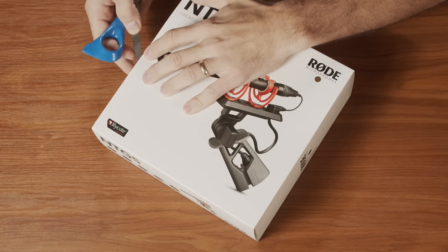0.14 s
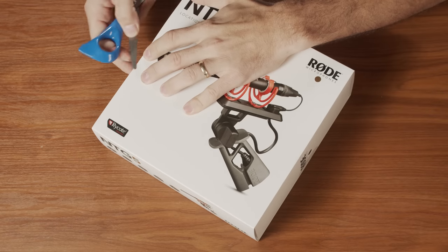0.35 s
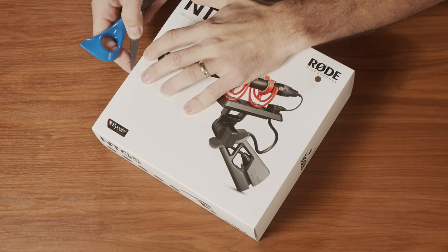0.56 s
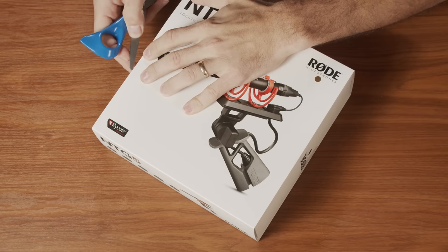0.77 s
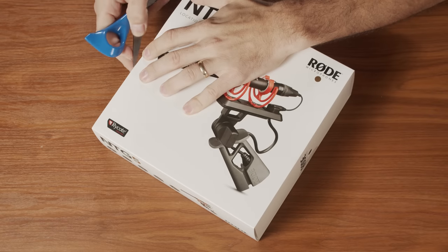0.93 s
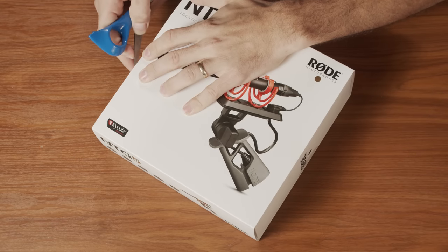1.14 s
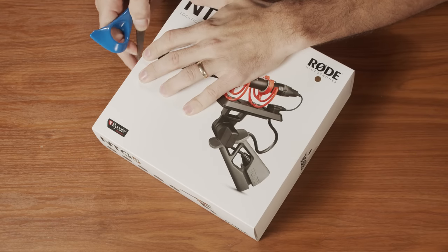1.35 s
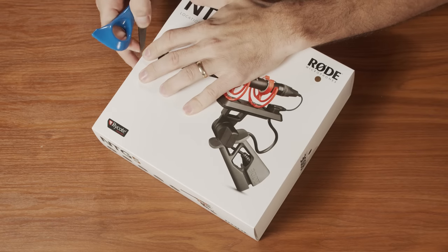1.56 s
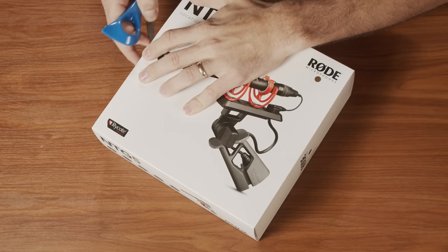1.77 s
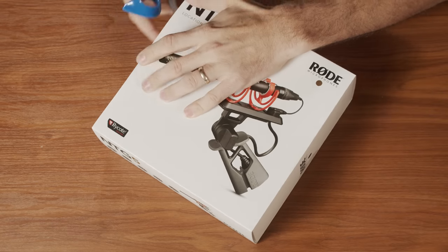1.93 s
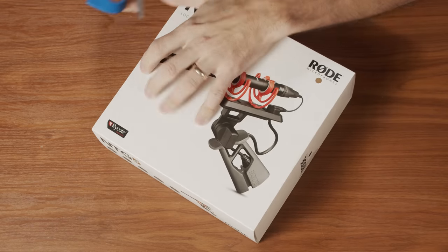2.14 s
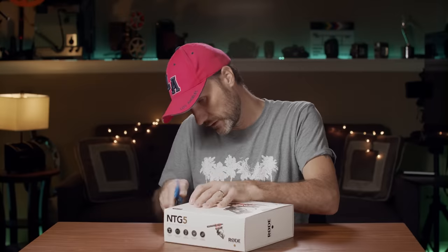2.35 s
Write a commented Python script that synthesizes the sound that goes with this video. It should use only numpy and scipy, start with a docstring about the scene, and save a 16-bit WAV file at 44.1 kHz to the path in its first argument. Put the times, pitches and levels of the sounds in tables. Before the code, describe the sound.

Close up in a small room, a scissor blade slits a cardboard box, first with irregular sharp cracks and hollow knocks, then after a pause straining creaks, a rough scrape, two snaps and a faint hand brush.

```python
"""A scissor blade works along the taped edge of a cardboard box on a wooden table, in a small room.
At first the blade sticks and slips in a short creak, and a short rubbing stroke follows: friction as random catches.
The seam then gives in dry snaps, noise bursts that knock the resonant hollow box and the table under it.
After a pause the blade strains and creaks again, then slides through in one long rasp and snaps free.
Last a hand brushes over the lid, as coloured friction noise; a steady room tone lies under everything."""
import sys
import numpy as np
from scipy import signal
from scipy.fft import rfft, irfft, next_fast_len
from scipy.io import wavfile
from scipy.ndimage import map_coordinates

SR = 44100
rng = np.random.default_rng(int(sys.argv[2]) if len(sys.argv) > 2 else 0)


def materialize(psi):
    """Save the field psi as 16-bit PCM at rate SR to the path in sys.argv[1].

    A 1-D psi becomes a single channel; in a 2-D psi each row is a channel.
    """
    bounded = np.clip(np.atleast_2d(psi).T, -1, 1)
    quanta = np.round(bounded * 32767).astype(np.int16)
    wavfile.write(sys.argv[1], SR, quanta)


N = 105840  # samples, 2.4 s

# The seam gives: t/s, crack level/dB, brightness/(dB per octave), tearing length/s,
# depth of the blade's resonances (0 to 1), own resonance f/Hz, its lift/dB, own dip f/Hz, its depth/dB,
# box knock level/dB, hollow note level/dB, deep thud level/dB
SEAM_SNAPS = [(0.2793, -8.5, -1, 0.0043, 0, 1250, 11, 2200, 4, 1, 6.5, -18),
              (0.3998, -4.5, -1, 0.0032, 1, 1370, 5.5, 2240, -5, -0.5, 4.5, 0),
              (0.526, 7.5, -2.6, 0.0019, 1, 3880, 9, 1950, 8, 13.5, 7.5, -13),
              (0.6115, -3.5, -1, 0.0046, 0.28, 1970, 6, 1500, 3, 3, -8, -5),
              (0.7255, 0, 2, 0.0022, 0.31, 3220, 3, 2270, 1, 11.5, 13, -14),
              (0.7323, -7.5, 0.5, 0.026, 0, 880, 6.5, 2000, -1, 4, 2, -13),
              (0.8234, -10.5, 0, 0.0021, 1, 2900, -1, 2200, 5, -22, -29, -12),
              (0.8586, 12, -2.5, 0.0029, 1, 2600, 3, 745, 14, 16, 19, 17),
              (.9525, -11.5, -1, 0.0091, 0.74, 1400, 1, 2200, -2, -1.5, 5.5, -3),
              (2.0418, 5.5, 3.5, 0.0023, 0.27, 2220, 3, 2950, 11, 12, 17.5, 2),
              (2.0954, 0.5, -0.4, 0.0043, 0.23, 1030, 5.5, 2620, 11, 10, 7.5, 1.5),
              (2.1830, -10.5, -4.5, 0.0036, .8, 715, 14, 1820, 11, -5.5, -3, -4),
              (2.1850, -16, 1, 0.017, 0.47, 3330, 12, 2470, 16, -22, -5, -20)]
# The blade sticks and slips: t/s, push level/dB, tick level/dB
BLADE_SLIPS = [(.0150, -4.5, -37), (0.1632, 3, -17.5), (0.1673, 2, -15), (0.1722, -4.5, -28),
               (.2205, -1.5, -17), (1.3788, 17, -7.5), (1.4126, 17.5, -5.5), (1.439, 17, -6.5),
               (1.4621, 16, -9.5), (1.4862, 9.5, -10), (1.6273, 5.5, -14.5), (1.7950, 10, -10.5),
               (1.8010, 6, -9), (1.826, 8.5, -8)]
# Sliding strokes, before the trims in slicing(): t/s, level of the box's drone/dB, level of the rasp/dB
SHORT_STROKE_LEVELS = [(.218, -62, -64), (.224, -51, -61), (.24, -36.5, -50), (.252, -37.5, -41.5),
                       (.264, -39.5, -54), (.278, -35, -42.5), (.29, -54, -53.5)]
STRAIN_LEVELS = [(1.28, -62, -64), (1.36, -49.5, -56.5), (1.44, -49, -59), (1.53, -63, -61)]
LONG_STROKE_LEVELS = [(1.6, -59, -86), (1.634, -46, -55.5), (1.72, -48, -59.5), (1.742, -43.5, -47.5),
                      (1.778, -42, -45.5), (1.8, -40, -37), (1.814, -46.5, -43.5), (1.824, -35.5, -47.5),
                      (1.85, -41.5, -40), (1.912, -34.5, -38.5), (1.934, -47, -41.5), (1.98, -37.5, -38),
                      (2.03, -48, -42.5)]
# Hand on the lid, before the trim in hand(): t/s, level/dB
HAND_LEVELS = [(2.2, -56), (2.235, -55), (2.29, -56), (2.33, -54.5), (2.39, -52.5)]
# Blade singing, treble in the long and the short stroke, air note under the long stroke: t/s, level/dB
BLADE_LEVELS = [(1.82, -66), (1.86, -43), (1.91, -43.5), (1.94, -50.5), (1.98, -44), (2.03, -60)]
LONG_FIZZ_LEVELS = [(1.74, -80), (1.8, -49.5), (1.84, -81), (1.9, -49.5), (1.975, -47.5), (2.03, -56)]
SHORT_FIZZ_LEVELS = [(.225, -75), (.245, -62), (.28, -59.5), (.29, -78)]
HOLLOW_LEVELS = [(1.78, -68), (1.8, -48), (1.85, -68), (1.91, -48), (1.98, -42.5), (2.03, -52)]

# Spectral colours of the parts: f/Hz, level/dB
CRACK_COLOUR = [(100, -16.5), (400, -16), (720, -1.5), (1000, -2.5), (1700, -2.5), (2800, -1.5), (4300, -8),
                (6000, -21.5), (8000, -36), (11000, -43), (15000, -48)]
PUSH_COLOUR = [(60, -35), (150, -15.5), (230, -8.5), (300, -2.5), (420, 3), (530, -5.5), (660, -14.5),
               (900, -27.5), (2000, -65.5), (6000, -104)]
THUD_COLOUR = [(40, -23.5), (95, -20), (135, 2.5), (165, 0.5), (188, 0.5), (222, -6.5), (268, -10),
               (340, -5.5), (500, -49), (2000, -63)]
TICK_COLOUR = [(200, -17), (700, -9), (1200, -1), (2000, -13), (3000, -16.5), (5000, -53.5), (10000, -45.5)]
RASP_COLOUR = [(350, -12.5), (600, 6), (678, 1), (979, -7.5), (1110, -6), (1510, -2.5), (2040, -7.5),
               (2340, -5), (2640, -5), (3070, -5), (3290, -5), (3570, -8.5), (4260, -8.5), (5440, -22),
               (9370, -39), (11300, -37.5), (15500, -59)]
BRUSH_COLOUR = [(120, -25), (330, 7), (550, -2.5), (900, -6.5), (1350, 0), (2000, -9), (3400, -1.5),
                (5500, -9.5), (8000, -27.5), (12000, -30.5), (15500, -52)]
FIZZ_TREBLE_COLOUR = [(2500, -45), (4200, 15.5), (5500, 9.5), (7500, -5.5), (9500, -11.5), (11600, -9.5),
                      (13000, -16), (15500, -17)]
ROOM_TONE_COLOUR = [(12, -54), (20, -0.5), (90, -6.5), (122, -1), (274, -11.5), (342, -1), (372, -25),
                    (416, -11.5), (705, -16), (834, -16.5), (1100, -19.5), (1300, -18.5), (1410, -20.5),
                    (1580, -20.5), (4950, -27.5), (8880, -48), (15500, -46.5)]
# Rubbing drives the box over a wide band: f/Hz, level/dB
DRONE_COLOUR = [(100, 4), (240, 4.5), (400, 4), (520, 3), (680, -0.5), (800, 19.5), (1200, 12.5)]

# Resonances of the box panels: f/Hz, level/dB, t60/s
BOX_PANELS = [(191, -10, 0.081), (305.7, -7, 0.058), (400.6, -10.5, 0.037), (482, -18, 0.21),
              (538, -0.5, 0.24)]
# Peaks and dips of the blade on the board: f/Hz, width/Hz, level/dB
STEEL_PEAKS = [(723, 73, -12), (1220, 140, 1.5), (1653, 90, 5.5), (2124, 393, -13.5), (2856, 190, 6.5),
               (3400, 600, -9), (4430, 140, -2), (4900, 480, -8)]
# Near reflections: delay/s, level/dB
WALL_REFLECTIONS = [(.0057, -13.5), (0.0133, -15)]
# Decay of the room: f/Hz, t60/s
ROOM_DECAY = [(120, 0.49), (400, 0.13), (1200, 0.16), (3000, .21), (10000, 0.11)]
# Colour of the diffuse room sound: f/Hz, level/dB
ROOM_TAIL_COLOUR = [(120, -5), (400, -8), (1200, -10.5), (3000, -13.5), (10000, -5.5)]

BLADE_HZ, BLADE_WIDTH_HZ = 2615, 240  # the blade sings while it slides fastest
HOLLOW_HZ, HOLLOW_WIDTH_HZ = 293, 47  # the air inside the box
FIBRES_PER_S, FIBRE_SPREAD_DB = 2600, 4.5
CLUMPS_PER_S, CLUMP_DB = 130, 3.5  # the board resists unevenly
ROOM_TONE_DB = -54
TOP_HZ = 15900  # upper band limit


def snaps(ragged=1.12, sharp=0.45, break_lag_s=0.0007, knock_lag_s=0.0014, thud_lag_s=0.00487,
          own_octaves=0.3, dip_octaves=0.13, aimed=0.59, thrown_db=-1, body_thrown_db=-2):
    """Impulsive fracture: a brief ragged tear with a sharp break knocks the box, and the box the table.

    Returns the direct sound and the smoother one thrown into the room."""
    cracks, thrown, knocks, hollows, thuds = np.zeros((5, N))
    t = np.arange(2048) / SR
    size = 2 * len(t)
    f = np.fft.rfftfreq(size, 1 / SR) + 1
    octaves = np.log2(np.clip(f, 700, 7000) / 2000)
    steel_db = sum(db * np.exp(-((f - hz) / width) ** 2) for hz, width, db in STEEL_PEAKS)
    for (s, crack_db, bright_db, length_s, depth, own_hz, lift_db, dip_hz, dip_db,
         knock_db, hollow_db, thud_db) in SEAM_SNAPS:
        tear = rng.standard_normal(len(t)) * np.exp(-(t / length_s) ** 2)
        tear *= ragged / np.linalg.norm(tear)
        add(tear, break_lag_s, np.array([sharp]))
        # levelling the spectrum leaves the colour to the filter below
        spectrum = rfft(tear, size)
        even = irfft(spectrum / np.sqrt(abs(spectrum) ** 2 + 0.2))[:len(t)]
        even_spectrum = rfft(even, size)
        broad_db = crack_db + along(CRACK_COLOUR, f) + bright_db * octaves
        peaks_db = depth * steel_db
        peaks_db += lift_db * np.exp(-(np.log2(f / own_hz) / own_octaves) ** 2)
        peaks_db -= dip_db * np.exp(-(np.log2(f / dip_hz) / dip_octaves) ** 2)
        # the thrown sound has shallower peaks and dips
        for track, share in (cracks, 1), (thrown, 1 - aimed):
            response = minimum_phase(broad_db + share * peaks_db)
            add(track, s, irfft(even_spectrum * response))
        add(knocks, s + knock_lag_s, amp([knock_db]))
        add(hollows, s + thud_lag_s, amp([hollow_db]))
        add(thuds, s + thud_lag_s, amp([thud_db]))
    body = box(knocks) + hollow(hollows) + filtered(thuds, causal(THUD_COLOUR))
    return cracks + body, amp(thrown_db) * thrown + amp(body_thrown_db) * body


def slicing(drone_db=-1, rasp_db=-2, low_edge_hz=450):
    """Sliding friction: parting fibres drive the box's drone, the edge's rasp, the steel and the air."""
    f = grid()
    strokes = [SHORT_STROKE_LEVELS, STRAIN_LEVELS, LONG_STROKE_LEVELS]
    drone_level = sum(swell(rows, column=1) for rows in strokes)
    rasp_level = sum(swell(rows, column=2) for rows in strokes)

    rubbing = filtered(fibres(smooth=0.93), causal(DRONE_COLOUR))
    drone = unit(box(rubbing)) * drone_level

    edge = causal(RASP_COLOUR) * f ** 2 / (f ** 2 + low_edge_hz ** 2)
    rasp = unit(filtered(fibres(smooth=0.76), edge)) * rasp_level

    singing = resonance(BLADE_HZ, BLADE_WIDTH_HZ) ** 2
    steel = unit(filtered(fibres(smooth=0.94), singing)) * swell(BLADE_LEVELS)

    fizz_level = swell(SHORT_FIZZ_LEVELS) + swell(LONG_FIZZ_LEVELS)
    fizz = unit(filtered(fibres(smooth=0.75), causal(FIZZ_TREBLE_COLOUR))) * fizz_level

    air = unit(hollow(fibres(smooth=0.94))) * swell(HOLLOW_LEVELS)
    return amp(drone_db) * drone + amp(rasp_db) * rasp + steel + fizz + air


def creak(tick_lag_s=0.00111):
    """Stick-slip: each slip of the blade jerks the panel and gives a dull tick."""
    pushes, ticks = np.zeros((2, N))
    for s, push_db, tick_db in BLADE_SLIPS:
        add(pushes, s, -amp([push_db]))
        add(ticks, s + tick_lag_s, amp([tick_db]))
    return box(pushes) + filtered(ticks, causal(TICK_COLOUR))


def box(force):
    """Modal resonance: the panel gives one damped push and the hollow box rings after it."""
    ring = 0
    for hz, db, t60_s in BOX_PANELS:
        width_hz = np.log(1000) / np.pi / t60_s  # bandwidth of a 60 dB decay in t60
        ring = ring + amp(db) * resonance(hz, width_hz)
    return filtered(force, causal(PUSH_COLOUR) * (0.58 + ring))


def hollow(force, onset_width_hz=300):
    """Cavity resonance: the air in the box answers with one low note, a wider stage softening its onset."""
    note = resonance(HOLLOW_HZ, HOLLOW_WIDTH_HZ)
    return filtered(force, note * resonance(HOLLOW_HZ, onset_width_hz))


def fibres(smooth):
    """Friction as a random pulse process: fibres catch and let go, over a smooth hiss."""
    caught = rng.random(N) < FIBRES_PER_S / SR
    sign = rng.choice([-1, 1], N)
    strength = amp(FIBRE_SPREAD_DB * np.clip(rng.standard_normal(N), -2, 2))
    catches = unit(caught * sign * strength * clumps())
    return unit(catches + smooth * rng.standard_normal(N))


def clumps():
    """Random amplitude modulation: the grip of the blade flutters."""
    knots = rng.standard_normal(2048)
    place = np.arange(N) * CLUMPS_PER_S / SR
    return amp(CLUMP_DB * map_coordinates(knots, [place], mode="wrap"))


def hand(trim_db=1):
    """Light friction: skin brushes over the lid."""
    brush = unit(filtered(fibres(smooth=1.2), causal(BRUSH_COLOUR)))
    return amp(trim_db) * swell(HAND_LEVELS) * brush


def room(x, thrown, wall_dull_hz=1700, count=12):
    """Reverberation: two near reflections and a short diffuse tail, drawn anew at even intervals."""
    f, wet = grid(), np.zeros(N)
    echoes = sum(amp(db) * np.exp(-2j * np.pi * f * s) for s, db in WALL_REFLECTIONS)
    walls = echoes / (1 + 1j * f / wall_dull_hz)
    # neighbouring tails crossfade at constant power
    place = np.linspace(0, count - 1, N)
    for k in range(count):
        share = np.sin(np.pi / 2 * np.maximum(1 - abs(place - k), 0))
        wet += signal.fftconvolve(thrown * share, tail())[:N]
    return filtered(x, 1 + walls) + filtered(wet, causal(ROOM_TAIL_COLOUR))


def tail(build_s=0.001):
    """Diffuse decay: noise of energy 1 that dies away exponentially at a rate set by frequency."""
    hz, t, z = signal.stft(rng.standard_normal(SR // 2), SR, nperseg=256)
    fall = amp(-60 * t / along(ROOM_DECAY, hz)[:, None])
    decay = signal.istft(z * fall, SR, nperseg=256)[1]
    decay *= 1 - np.exp(-np.arange(len(decay)) / SR / build_s)
    return decay / np.linalg.norm(decay)


def room_tone():
    """Stationary noise: steady low rumble and hiss of the room."""
    colour = amp(along(ROOM_TONE_COLOUR, grid()))
    return amp(ROOM_TONE_DB) * unit(filtered(rng.standard_normal(N), colour))


def amp(db):
    """Level to amplitude: 20 dB is a factor of ten."""
    return 10 ** (np.asarray(db) / 20)


def unit(x):
    """Normalisation: scale to rms 1."""
    return x / np.sqrt(np.mean(x ** 2) + 1e-20)


def along(points, hz):
    """Logarithmic pitch: (f/Hz, value) points interpolated on a log frequency axis."""
    f, v = np.transpose(points)
    return np.interp(np.log(hz + 1), np.log(f + 1), v)


def grid():
    """Zero padding: the frequencies in Hz of a transform longer than the scene."""
    return np.fft.rfftfreq(2 * next_fast_len(N * 3 // 4), 1 / SR)


def filtered(x, response):
    """Linear filtering: x multiplied in frequency by a response on the grid."""
    size = 2 * (len(response) - 1)
    return irfft(rfft(x, size) * response)[:N]


def minimum_phase(db):
    """Causality: folding the cepstrum gives the minimum-phase response with the given gains."""
    c = irfft(np.log(amp(db)))
    c[1:len(c) // 2] *= 2
    c[len(c) // 2 + 1:] = 0
    return np.exp(rfft(c))


def causal(points):
    """Minimum phase: the causal response of a colour on the grid."""
    return minimum_phase(along(points, grid()))


def resonance(hz, width_hz):
    """Damped oscillator: one resonance with gain 1 at its top."""
    f = grid()
    return 1j * f * width_hz / (hz * hz - f * f + 1j * f * width_hz)


def swell(rows, column=1):
    """Envelope: gain of a level curve, fading exponentially (18 ms) outside its span."""
    rows, t = np.array(rows), np.arange(N) / SR
    outside_s = np.maximum(rows[0, 0] - t, 0) + np.maximum(t - rows[-1, 0], 0)
    level_db = np.interp(t, rows[:, 0], rows[:, column])
    return amp(level_db) * np.exp(-outside_s / 0.018)


def add(track, s, sound):
    """Superposition: mix a sound into a track at time s."""
    part = track[max(round(s * SR), 0):][:len(sound)]
    part += sound[:len(part)]


def scene():
    """Superposition of blade, box and hand in the room, over the room tone."""
    direct, thrown = snaps()
    rubbing = creak() + slicing() + hand()
    return (room(direct + rubbing, thrown + rubbing) + room_tone())[None]


def record(dry):
    """Band limitation: nothing from TOP_HZ upwards is kept."""
    return np.array([filtered(x, grid() < TOP_HZ) for x in dry])


dry = scene()
out = record(dry)
materialize(out)
```